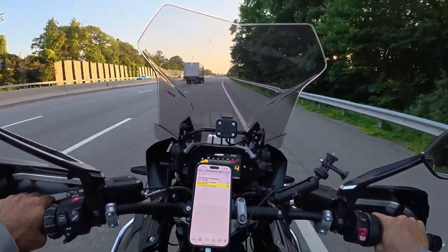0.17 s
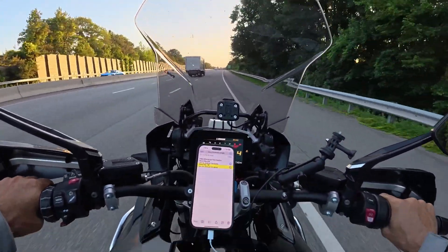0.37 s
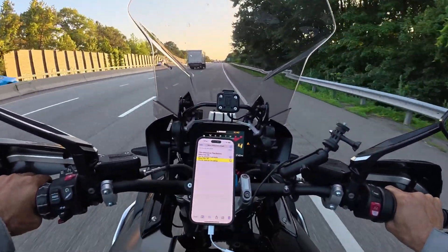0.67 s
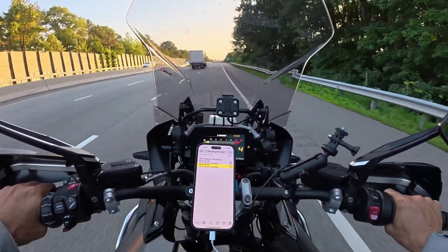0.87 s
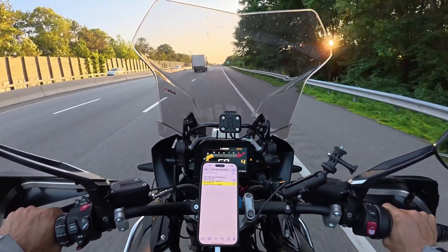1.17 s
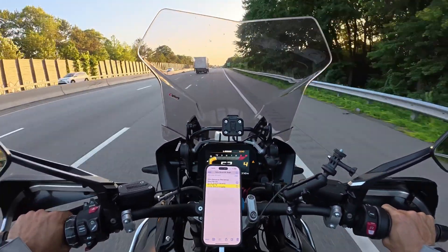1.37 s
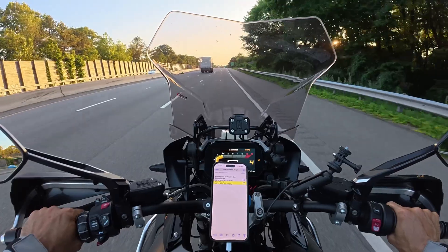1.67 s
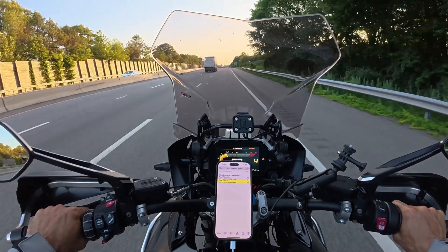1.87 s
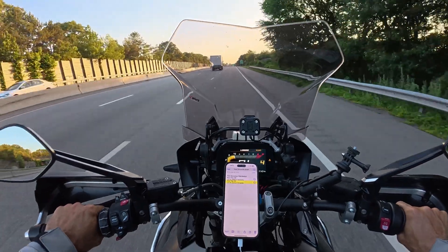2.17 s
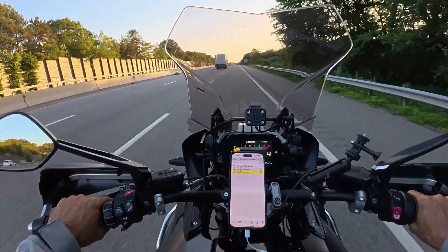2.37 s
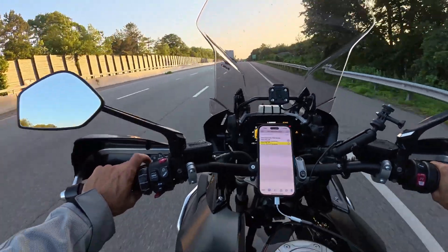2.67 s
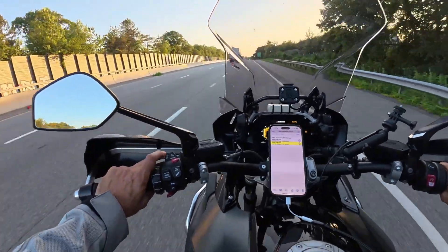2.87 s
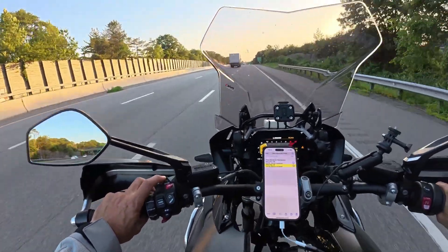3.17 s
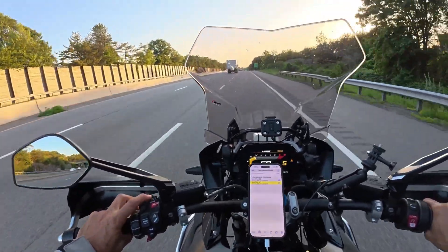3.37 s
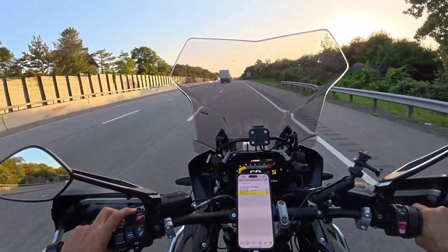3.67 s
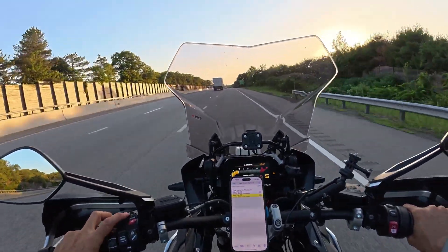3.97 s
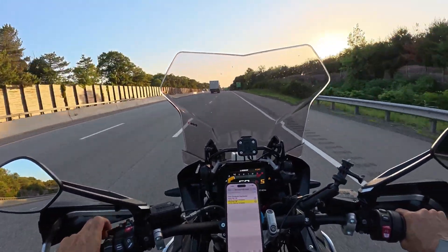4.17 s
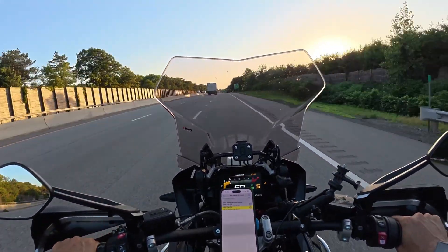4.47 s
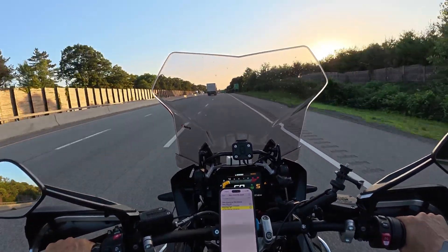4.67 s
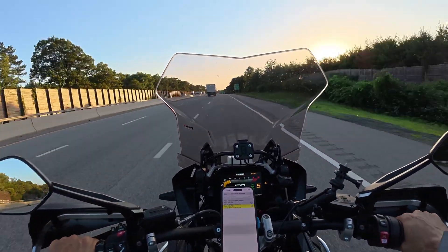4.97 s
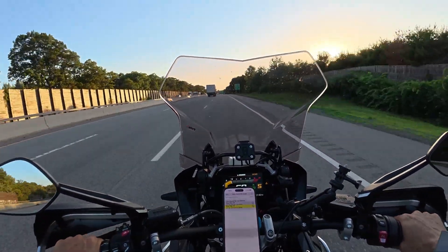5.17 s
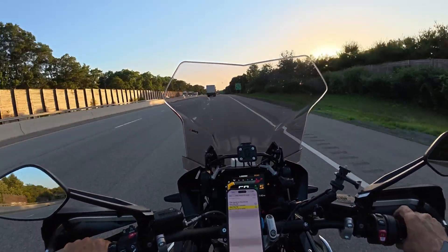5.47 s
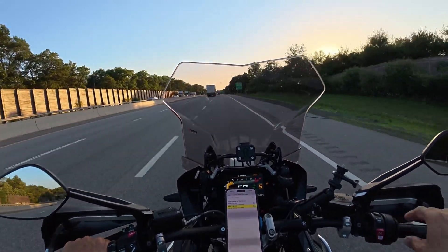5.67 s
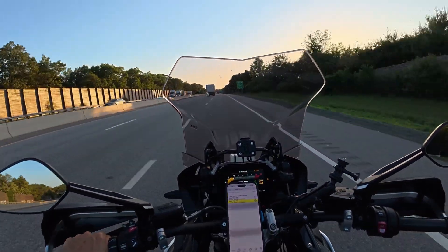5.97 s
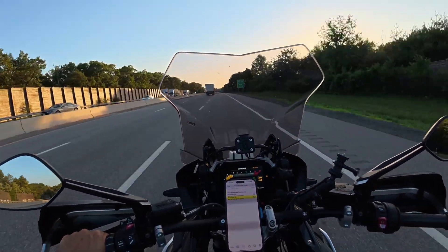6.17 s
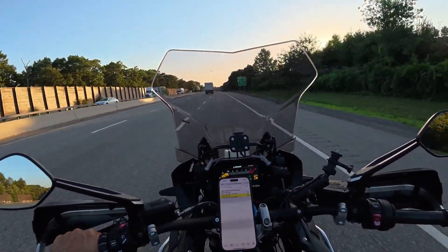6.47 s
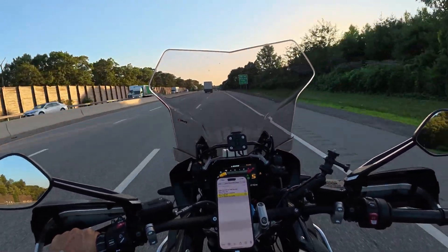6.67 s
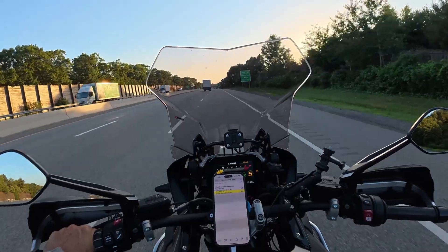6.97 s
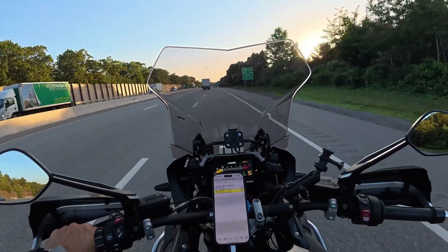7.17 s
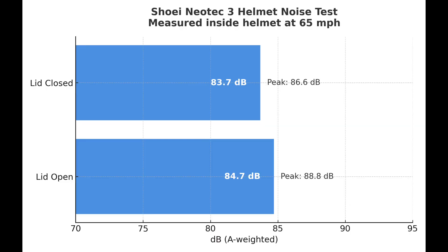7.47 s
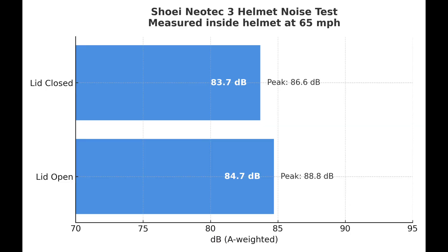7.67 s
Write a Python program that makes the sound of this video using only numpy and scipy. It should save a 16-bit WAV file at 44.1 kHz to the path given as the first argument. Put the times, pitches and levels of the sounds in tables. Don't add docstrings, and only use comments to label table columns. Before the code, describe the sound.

Buzzy motorcycle engine drone with two quick upshifts, constant wind roar and microphone-thumping buffets, settling into a whining cruise that fades out completely.

```python
import sys
import numpy as np
from scipy import signal
from scipy.io import wavfile
from scipy.ndimage import uniform_filter1d

SR = 44100
rng = np.random.default_rng(int(sys.argv[2]) if len(sys.argv) > 2 else 0)


def master(y):
    cut = np.clip(np.atleast_2d(y).T, -1, 1)
    pcm = np.round(cut * 32767)
    wavfile.write(sys.argv[1], SR, pcm.astype(np.int16))


def linear_from_db(decibels):
    return 10 ** (np.asarray(decibels, float) / 20)


N = 344421

TOP_GEAR_S = 2.2


def rms_one(x):
    return x / np.sqrt(np.mean(x ** 2) + 1e-20)


def in_time(rows):
    s, *columns = np.transpose(rows)
    return [np.interp(np.arange(N) / SR, s, c) for c in columns]


def ramp(middle, length):
    return np.clip((np.arange(N) / SR - middle) / length + .5, 0, 1)


def drift(rate):
    r = np.exp(-80 * np.pi * rate / SR)
    settled = 2000
    white = rng.standard_normal(N // 40 + 2 + settled)
    slow = signal.lfilter([1], [1, -2 * r, r * r], white)[settled:]
    return np.interp(np.arange(N) / 40, np.arange(len(slow)), rms_one(slow))


def resonance(x, hz, width):
    r = np.exp(-np.pi * width / SR)
    return signal.lfilter([1, 0, -1], [1, -2 * r * np.cos(2 * np.pi * hz / SR), r * r], x)


def high_pass(x, hz):
    return signal.sosfilt(signal.butter(2, hz, "high", fs=SR, output="sos"), x)


def banded_noise(spectrum, patchy_db, rate):
    hz, level_db = np.transpose(spectrum)
    edges = hz[0] * 2 ** np.arange(0, np.log2(hz[-1] / hz[0]) + 1 / 3, 1 / 3)
    white = rng.standard_normal((2, N))
    out = 0
    for k, (low, high) in enumerate(zip(edges, edges[1:])):
        band_pass = signal.butter(2, [low, high], "band", fs=SR, output="sos")
        band = signal.sosfilt(band_pass, white[k % 2])
        centre_db = np.interp(np.log(low * high) / 2, np.log(hz), level_db)
        out = out + linear_from_db(centre_db + patchy_db * drift(rate)) * band
    return rms_one(out)


def crank_speed():
    # (time [s], firing rate [1/s])
    crank = [(0, 69.3), (.07, 64.8), (.2, 56.6), (.3, 56.5), (.55, 57.7), (.93, 59.7), (1.54, 63),
             (1.72, 63.8), (2.115, 66.2), (2.185, 62), (2.23, 61.6), (2.29, 58.6), (2.42, 59.4),
             (3.73, 63.1), (3.84, 63.7), (6.1, 63.8), (6.31, 63.4), (7.3, 63.4)]
    return in_time(crank)[0]


def throttle():
    # (time [s], load against the smoothed rush [dB], boom of the fourth order [dB])
    hand = [(0, -.5, -22.5), (.1, 2, -18.5), (.22, -6, -30), (.3, -6.5, -19), (.35, -7, -13),
            (.48, -6, -9.5), (.6, -1, -19.5), (.83, -.5, -12.5), (1.2, .5, -13.5), (1.53, 2, -14.5),
            (1.9, 1, -19), (2.08, 1, -22), (2.22, -5.5, -20), (2.43, 2, -26), (2.9, -2, -20),
            (3.8, -2.5, -21), (4.4, -9, -24), (4.62, -14, -34)]
    return in_time(hand)


def airflow():
    # (time [s], rush level [dB])
    flow = [(0, -32.5), (.3, -33), (.38, -35), (.55, -40), (.62, -35), (.75, -35), (.9, -38), (1.4, -38.5),
            (1.85, -36.5), (2.1, -36.5), (2.3, -35.5), (2.5, -34.5), (3.1, -36), (3.96, -38.5), (4.55, -36),
            (5.05, -35.5), (5.3, -37.3), (7.25, -37.5)]
    return in_time(flow)[0]


def exhaust(rate, turns, load_db):
    order_db = [8, 13.5, 11.6, -64.5, 10.5, -2.5, 8, 3, -1.5, -0.5, -2, 0, -8, -2, -3, -5]
    follows_load = [.2, .35, .4, 1.0, .8, .5, .8, .8, 0, 2.5, .8, 1.0, .5, 1.0, .5, .5]
    # (frequency [Hz], width [Hz], lift [dB])
    pipe = [(428, 13, 4), (640, 40, 7.5), (670, 16, -0.5), (963, 24, 7)]
    wander = 0.047 * drift(3.7)
    starved_db = -13 * (1 - ramp(.28, .2))
    out = 0
    for k, (level_db, share) in enumerate(zip(order_db, follows_load), 1):
        lift_db = sum(db / (1 + (2 * (k * rate - hz) / width) ** 2) for hz, width, db in pipe)
        order_level_db = level_db + lift_db + share * load_db + .8 * drift(5.7)
        if k % 2 and k > 1:
            order_level_db = order_level_db + starved_db
        scatter = max(k - 5, 0) ** 2
        phase = k * (2 * np.pi * turns + wander) - .3 + scatter
        out = out + linear_from_db(order_level_db) * np.sin(phase)
    return out


def boom(turns, level_db):
    lag = .9 * (1 - ramp(TOP_GEAR_S, .4))
    return np.sqrt(2) * linear_from_db(level_db) * np.sin(8 * np.pi * turns + .1 * drift(4) - lag)


def gears(turns):
    mesh_orders = [3.745, 7.22, 10.83, 54.15]
    mesh_db = [8, 7, 4, -11.5]
    top, cruise = ramp(TOP_GEAR_S, .4), ramp(4.3, 1.6)
    whine_db = -10 + 7 * top + 3.5 * cruise
    whistle_db = -14 + 2 * top + 13.5 * cruise
    out = 0
    for k, db in zip(mesh_orders, mesh_db):
        ride_db = whine_db if k < 20 else whistle_db
        level = linear_from_db(db + ride_db + 1.5 * drift(5))
        out = out + level * np.sin(2 * np.pi * k * turns + .015 * k * drift(12))
    return out


def panels(turns):
    # (start [s], end [s], pitch [Hz], width [Hz], level against the rush [dB])
    loose = [(0, .5, 2480, 260, -9), (.9, 4.0, 2480, 260, -9.5), (4.0, 7.3, 2500, 260, -13),
             (.1, .95, 3430, 260, -12), (.6, 1.3, 3700, 260, -12), (.95, 1.95, 3450, 200, -16),
             (1.2, 2.3, 3820, 160, -10.5), (2.4, 4.5, 3740, 200, -15), (2.6, 3.0, 3260, 160, -12),
             (2.22, 2.45, 3450, 200, -14), (1.3, 1.9, 1600, 110, -12), (2.45, 3.3, 5180, 350, -17),
             (1.4, 2.0, 6150, 280, -17), (0, .35, 6400, 500, -15), (4.2, 6.0, 6260, 350, -21),
             (.12, .3, 720, 30, 11), (.12, .36, 600, 300, 10)]
    firing, t = turns.astype(int), np.arange(N) / SR
    strength_db = 0.47 * rng.standard_normal(firing[-1] + 1)[firing] - 2.5 * (firing % 2)
    rattle = linear_from_db(strength_db) * np.exp(-2.0 * (turns % 1)) * rng.standard_normal(N)
    out = 0
    for start, end, hz, width, db in loose:
        gate = np.clip(np.minimum(t - start, end - t) / 0.1 + .5, 0, 1)
        ring = resonance(resonance(rattle, hz, width), hz, width)
        out = out + linear_from_db(db) * gate * rms_one(ring)
    return out


def wind(turns, flow_db, load_db):
    # (frequency [Hz], density [dB per Hz])
    rush_spectrum = [(760, -29), (1300, -3.5), (1550, -5.5), (1950, -4), (2480, -5), (3680, -7),
                     (4390, -10), (5250, -10.5), (6660, -15.5), (8920, -25.5), (12400, -34.5), (15600, -40)]
    # (frequency [Hz], density [dB per Hz])
    roar_spectrum = [(150, -23), (250, -4.5), (357, -18), (452, -6.5), (522, -12.5), (680, -11), (886, -15),
                     (979, -18), (1130, -16), (1800, -34.5), (2200, -39.5), (2860, -81), (4840, -120)]
    throb = 1 + 0.16 * np.cos(2 * np.pi * turns)
    air_db = flow_db + .7 * drift(23) + .3 * drift(4)
    rush = linear_from_db(air_db) * banded_noise(rush_spectrum, patchy_db=0.95, rate=5.5)
    roar_db = air_db + 11.7 - .07 * load_db
    roar = linear_from_db(roar_db) * throb * banded_noise(roar_spectrum, patchy_db=.8, rate=8)
    return rush + roar


def buffet_level():
    # (time [s], peak level [dB], time to fall 20 dB either side [s])
    gusts = [(0, -28.5, .07), (.22, -24, .1), (.31, -35, .15), (.75, -35, .12), (1.13, -36.5, .15),
             (1.62, -37, .4), (1.89, -24.5, .2), (1.97, -17, .09), (2.12, -23.5, .2), (2.28, -32, .3),
             (2.8, -21.5, .08), (2.92, -30, .15), (3.16, -24, .08), (3.3, -34, .3), (3.57, -26, .15),
             (3.89, -24, .14), (4.21, -35, .2), (4.66, -29, .35), (4.83, -30.5, .15), (5.12, -27.5, .2),
             (5.21, -18.5, .07), (5.5, -26.5, .2), (5.66, -27, .12), (6.086, -15, .05), (6.16, -25, .25),
             (6.62, -29, .4), (5.88, -33, .3), (6.95, -35, .6)]
    t, level_db = np.arange(N) / SR, np.full(N, -42.0)
    for s, db, fall in gusts:
        level_db = np.maximum(level_db, db - 20 * np.abs(t - s) / fall)
    return level_db


def buffets(level_db):
    # (frequency [Hz], density [dB per Hz])
    thump_spectrum = [(30, -14), (55, -16.5), (90, 1), (150, 0.5), (220, -10), (320, -33), (450, -17)]
    return linear_from_db(level_db + 4) * banded_noise(thump_spectrum, patchy_db=2.0, rate=8.1)


def ticks(runs, turns, length, count):
    out = np.zeros(N)
    t = np.arange(int(3 * length * SR)) / SR / length
    pitch_rise = .99 + .01 * t
    swell = t * np.exp(-3.0 * t)
    for start, end, run_db, run_hz in runs:
        firings = np.arange(turns[round(start * SR)], turns[round(end * SR)], count)
        starts = np.searchsorted(turns, firings)
        for k, (i, chance) in enumerate(zip(starts, rng.standard_normal((40, 2)))):
            fade_db = -3 * k / len(firings)
            weak_db = -5 * (k * count % 2)
            db = run_db + fade_db + weak_db + 1.5 * chance[0]
            hz = run_hz * (1 + .01 * chance[1])
            tone = np.sin(2 * np.pi * hz * length * t * pitch_rise)
            out[i:i + len(t)] += linear_from_db(db + 16.0) * swell * tone
    return out


def valve_chirps(turns):
    # (start [s], end [s], peak level [dB], pitch [Hz])
    chirp_runs = [
        (.149, .18, -25, 3470),
        (.2813, .34, -22, 3410),
        (.388, .51, -28, 3380),
        (.5277, .79, -27.5, 3400),
        (.821, .9, -31, 3450),
        (2.2593, 2.3, -25, 3480),
        (2.3411, 2.39, -28, 3470),
    ]
    return ticks(chirp_runs, turns, length=.008, count=1)


def capsule_stops():
    # (time [s], time held [s], surge level [dB], direction [sign])
    stops = [(1.9163, .0088, -7, -1), (1.9522, .005, -9, -1), (1.9642, .0055, -3, -1),
             (2.0763, .002, -20, -1), (3.1728, .0022, -15, -1), (3.9046, .0025, -20, -1),
             (3.9171, .012, -14, -1), (4.181, .0045, -16, -1), (5.2039, .005, -11, -1),
             (5.2208, .0128, -11, 1), (6.0597, .0168, -13, -1), (6.0946, .0148, -9, 1),
             (6.2643, .0108, -17, -1)]
    rise = .0025
    t, free, surge = np.arange(N) / SR, np.ones(N), np.zeros(N)
    for s, held, surge_db, direction in stops:
        free *= np.clip(np.maximum(s - t, t - s - held) / .0006, 0, 1)
        arrives = (t - s) / rise + .15
        leaves = (s + held - t) / (4 * rise) + 1
        surge += direction * linear_from_db(surge_db + 7) * np.clip(np.minimum(arrives, leaves), 0, 1)
    return free, high_pass(uniform_filter1d(surge, size=60), 120)


def bracket_pips(turns):
    # (start [s], end [s], peak level [dB], pitch [Hz])
    pip_runs = [
        (2.4403, 2.51, -30, 1540),
        (2.677, 3.12, -31, 1560),
    ]
    return ticks(pip_runs, turns, length=.020, count=2)


def scene():
    rate, (load_db, boom_db), flow_db = crank_speed(), throttle(), airflow()
    turns = np.cumsum(rate) / SR
    engine = exhaust(rate, turns, load_db) + gears(turns) + panels(turns)
    steady_db = uniform_filter1d(flow_db, size=SR // 4, mode="nearest")
    ride = linear_from_db(steady_db) * engine + boom(turns, boom_db) + wind(turns, flow_db, load_db)
    ride = ride + valve_chirps(turns) + bracket_pips(turns)
    buffet_db = buffet_level()
    duck_db = -.35 * np.maximum(buffet_db + 29, 0)
    return (linear_from_db(duck_db) * ride + buffets(buffet_db))[None]


def low_pass(x):
    return signal.sosfilt(signal.butter(12, 15800, fs=SR, output="sos"), x)


def record(dry):
    free, surge = capsule_stops()
    heard = high_pass(dry * free + surge, 45)
    heard = signal.sosfilt(signal.cheby2(12, 60, 16200, fs=SR, output="sos"), heard)
    silent, fade_length = 7.257, 3.0
    t = np.arange(N) / SR
    fade = np.clip((silent + .015 - t) / fade_length, 0, 1) ** .85
    fade = fade * (1 - ramp(silent - .003, .006))
    return low_pass(heard * fade)


dry = scene()
out = record(dry)
master(out)
```